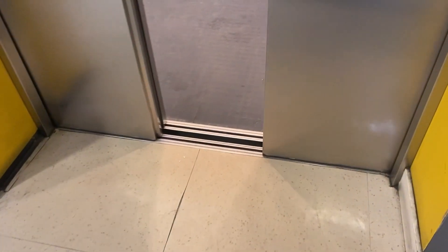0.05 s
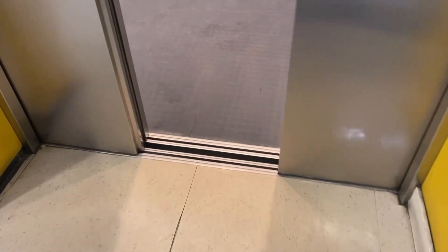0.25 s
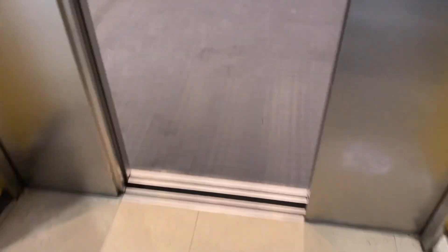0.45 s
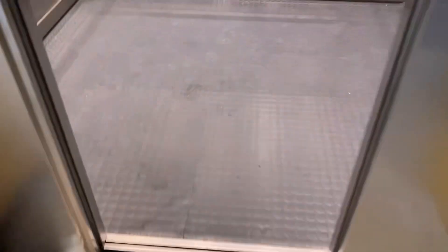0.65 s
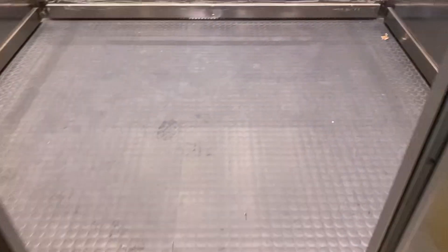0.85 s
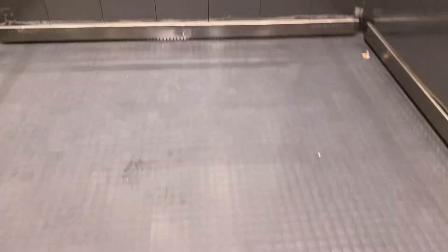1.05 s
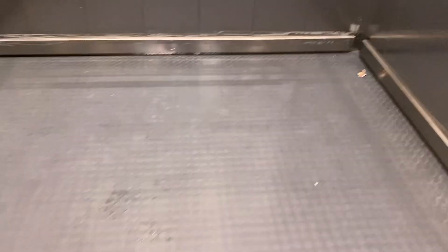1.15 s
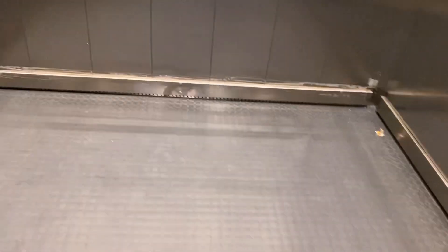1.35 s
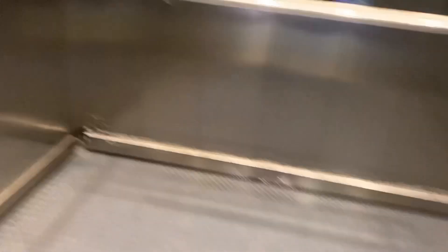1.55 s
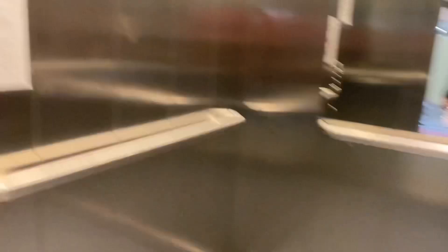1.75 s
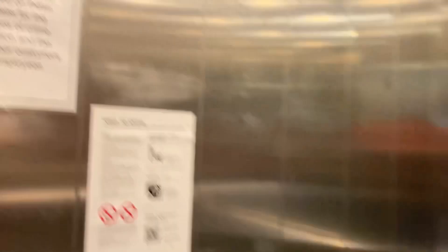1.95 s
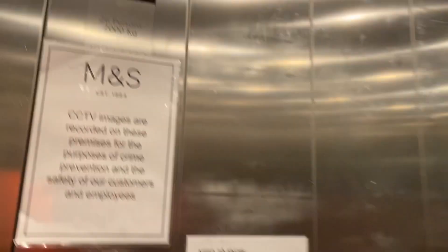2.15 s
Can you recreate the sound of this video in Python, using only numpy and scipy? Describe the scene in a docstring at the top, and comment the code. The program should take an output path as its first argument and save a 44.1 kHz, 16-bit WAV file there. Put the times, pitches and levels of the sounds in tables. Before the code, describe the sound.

Metal lift doors jolt open with a loud rattling clatter that rings and fades over low hum

```python
"""Steel lift doors jolt into motion and slide open in a hard, echoing lobby.
Knocks on the hangers drive decaying panel modes, noise cracks with a long wash, and chattering fittings.
Rollers make the panels drone (wandering sine), the car rumble (resonant noise) and the track hiss.
Dull bumps and bright ticks are decaying noise; ventilation noise, a low hum and an early thin whine lie beneath."""
import sys
import numpy as np
from scipy import signal
from scipy.fft import rfft, irfft, next_fast_len
from scipy.io import wavfile

SR = 44100
rng = np.random.default_rng(int(sys.argv[2]) if len(sys.argv) > 2 else 0)


def master(y):
    """Save y as 16-bit WAV."""
    cut = np.clip(np.atleast_2d(y).T, -1, 1)
    pcm = np.round(cut * 32767)  # scale
    wavfile.write(sys.argv[1], SR, pcm.astype(np.int16))


N = 97020
T = np.arange(N) / SR

# panels knocking on their hangers: [t/s, relative level/dB, favoured pitch f/Hz]
KNOCKS = [(0.2, -13.5, 219), (.211, -6.5, 262), (0.225, -2.5, 322), (0.243, 0, 317), (0.261, -1.5, 590),
          (0.279, -1, 450), (.31, -4, 738), (0.349, -7, 588), (.399, -6.5, 446), (0.482, -7, 335),
          (.535, -14.5, 446), (0.605, -11.5, 402), (.675, -16.5, 720), (0.773, -18.5, 446), (.81, -31, 528),
          (.922, -21, 330)]
KNOCK_BLOWS = [(s, db) for s, db, _ in KNOCKS]


def from_db(db):
    """Decibels to amplitude gain."""
    return 10 ** (np.asarray(db) / 20)


def rms_one(x):
    """Scale to unit rms."""
    return x / np.sqrt(np.mean(x ** 2) + 1e-20)


def level(rows):
    """Gain over time from [t/s, level/dB] points."""
    return from_db(np.interp(T, *np.transpose(rows)))


def at_hz(points, hz):
    """Read a table on a log-frequency axis."""
    f, v = np.transpose(points)
    return np.interp(np.log(hz), np.log(f), v)


def pan(left_minus_right_db):
    """Left and right gains for a level difference."""
    return from_db(np.array([[.5], [-.5]]) * left_minus_right_db)


def sine(hz, start_cycles=0):
    """Unit-rms sine following a frequency track."""
    return np.sqrt(2) * np.sin(2 * np.pi * (start_cycles + np.cumsum(hz) / SR))


def drift(rate_hz):
    """Random fluctuation, spread 1: two-pole low-passed noise at SR / 40, interpolated."""
    step = 40
    r = np.exp(-2 * np.pi * rate_hz * step / SR)
    settle = 2000
    noise = rng.standard_normal(N // step + 2 + settle)
    slow = signal.lfilter([1], [1, -2 * r, r * r], noise)[settle:]
    return np.interp(np.arange(N) / step, np.arange(len(slow)), rms_one(slow))


def resonance(hz, width_hz):
    """Noise through one steep-sided resonance; rms 1."""
    sos = signal.butter(2, [hz - width_hz / 2, hz + width_hz / 2], "band", fs=SR, output="sos")
    return rms_one(signal.sosfilt(sos, rng.standard_normal(N + SR // 2))[-N:])


def dying(events, t60_s, build_s):
    """Amplitude envelope of blows whose energies build up, add and die away."""
    energy = np.zeros(N)
    shape = from_db(-120 * T / t60_s) * (1 - np.exp(-T / build_s))  # energy: twice the dB of amplitude
    for s, db in events:
        start = int(s * SR)
        energy[start:] += from_db(db) ** 2 * shape[:N - start]
    return np.sqrt(energy)


def banded(spectrum, envelope):
    """Third-octave bands of stereo noise, rms 1 in sum, each then shaped by envelope(hz)."""
    # left-right likeness of the noise: [f/Hz, coherence]
    likeness = [(100, 1), (250, 1), (430, 0.84), (780, 1), (1100, 0.077), (1450, 0.032), (2000, 0.67),
                (2700, 0.033), (4000, 0.39), (5700, 1), (7200, 1), (15000, 1)]
    edges = 19 * 2 ** (np.arange(30) / 3)
    white = rng.standard_normal((2, 2, N + SR // 10))  # neighbouring bands use different noise
    out, power = 0, 0
    for k, (low, high) in enumerate(zip(edges, edges[1:])):
        sos = signal.butter(2, [low, high], "band", fs=SR, output="sos")
        mid, side = signal.sosfilt(sos, white[k % 2])[:, -N:]
        hz = np.sqrt(low * high)
        alike = np.clip(at_hz(likeness, hz), -.9, .999)
        gain = from_db(at_hz(spectrum, hz)) * np.sqrt(high - low)
        mid = np.sqrt(1 + alike) * rms_one(mid)
        side = np.sqrt(1 - alike) * rms_one(side)
        out = out + gain * envelope(hz) * np.array([mid + side, mid - side])
        power += 2 * gain ** 2
    return out / np.sqrt(power)


def ventilation():
    """Airflow as coloured noise, each band flickering in level."""
    # [f/Hz, relative density/dB per Hz]
    air_colour = [(20, -17), (35, 7), (55, -1), (120, -2), (180, -1), (350, -2), (550, -6), (900, -10.5),
                  (1500, -14.5), (2100, -15), (2900, -19.5), (5700, -28.5), (7200, -36.5), (9100, -38.5),
                  (11500, -41.5), (14500, -41)]
    air_db, flicker_db, pan_db = -39, 1.54, 1

    def envelope(hz):
        """Left and right level of one band; the bass stays central."""
        return pan(pan_db * (hz > 250)) * from_db(flicker_db * drift(21))
    return from_db(air_db) * banded(air_colour, envelope)


def machine_hum():
    """Low machine hum: a sine with slight phase drift and a changing level."""
    # [t/s, level/dB]
    hum_level = [(0, -53), (.45, -42.5), (.6, -32.5), (.9, -46), (1.05, -38), (1.45, -42), (1.8, -45.5),
                 (1.92, -56), (2.2, -43)]
    hum_hz, phase_drift_rad = 79.83, 0.11
    tone = np.sin(2 * np.pi * hum_hz * T + phase_drift_rad * drift(1))
    return level(hum_level) * np.sqrt(2) * tone


def whine():
    """A thin, unsteady sine rises in pitch, then stops as the doors start."""
    start_hz, rise_hz_per_s, jitter_hz = 5370, 800, 12
    level_db, flutter_db, end_s = -66, 2.3, 0.21
    hz = start_hz + rise_hz_per_s * T + jitter_hz * drift(40)
    return from_db(level_db + flutter_db * drift(30)) * sine(hz) * (T < end_s)


def panel_drone():
    """Rolling makes the panels drone: one sine wandering in pitch."""
    # [t/s, level/dB]
    drone_level = [(0, -42), (.19, -48), (.23, -29.5), (.28, -29), (.35, -41), (.44, -30), (.55, -22),
                   (.67, -31.5), (.73, -38.5), (.78, -31.5), (.85, -27), (.92, -40.5), (1.03, -36),
                   (1.16, -34.5), (1.33, -46), (1.45, -69), (2.2, -64)]
    drone_hz, wander_hz = 153.5, 2.17
    return level(drone_level) * sine(drone_hz + wander_hz * drift(2.25))


def car_rumble():
    """The rollers excite the car's resonances with noise."""
    # [t/s, level/dB, before the resonances' own levels]
    roll_level = [(0, -49), (.3, -48), (.48, -40), (.6, -31), (.8, -36.5), (1.1, -36.5), (1.45, -45.5),
                  (1.75, -48.5), (1.95, -44.5), (2.2, -45)]
    # car resonances: [f/Hz, width/Hz, relative level/dB]
    car_modes = [(80.4, 60, -4.5), (95.2, 4.9, -8), (167, 19, -7.5), (211, 70, -3), (333.8, 46, -6.5),
                 (1870, 420, -16)]
    return level(roll_level) * sum(from_db(db) * resonance(hz, width) for hz, width, db in car_modes)


def car_sway():
    """The car shudders as the doors gather speed: a low sine under a bell-shaped swell."""
    sway_hz, centre_s, length_s, peak_db = 32.8, 0.47, 0.1, -40
    swell = np.exp(-((T - centre_s) / length_s) ** 2)
    return from_db(peak_db) * swell * np.sqrt(2) * np.sin(2 * np.pi * sway_hz * T)


def track_hiss():
    """Rolling contact on the track: coloured noise of changing level."""
    # [t/s, level/dB]
    hiss_level = [(0, -59.5), (.56, -56), (.6, -45), (.72, -50.5), (.88, -56), (.95, -50.5), (1.06, -50),
                  (1.2, -54), (1.38, -56.5), (1.5, -53.5), (1.64, -52), (1.85, -55), (2.2, -65)]
    # [f/Hz, relative density/dB per Hz]
    hiss_colour = [(100, 30.5), (600, 4), (1500, 22.5), (5700, 17.5), (9100, 10.5), (11500, 10), (14500, 3)]
    return level(hiss_level) * banded(hiss_colour, lambda hz: 1)


def bumps():
    """Dull knocks of doors and car, each a broad noise resonance that dies away."""
    # [t/s, level/dB, centre f/Hz]
    bump_rows = [(.06, -32, 180), (1.604, -39, 186), (1.61, -36, 560), (1.685, -34.5, 230),
                 (1.735, -34, 188), (1.842, -36.5, 179)]
    width_share = 0.79  # bandwidth / centre
    out = 0
    for s, db, hz in bump_rows:
        out = out + resonance(hz, hz * width_share) * dying([(s, db)], t60_s=0.36, build_s=0.0014)
    return out


def panel_modes():
    """Knocks feed the panels' modes, most of all those near their own pitch; the loose steel wavers."""
    # [f/Hz, relative level/dB, t60/s, left minus right/dB]
    modes = [(219, -22, 0.39, -2), (261.6, -34, 0.46, -2), (315.2, -22, 0.54, 0), (347.2, -28, 1.43, -1),
             (404, -28, 0.3, 8), (446, -20, 0.59, 1), (528.3, -21.5, 0.4, 2.5), (568, -24, 0.74, 3),
             (635.4, -25, 0.81, -8), (657, -29.5, 1.2, 10), (682, -28, 1.3, 7), (741, -22, 0.69, -5.5),
             (877, -39, 0.92, 4), (915, -37.5, 1.4, -6), (1034, -26.5, 1.1, -1), (1182, -33, 1.05, -0.5),
             (1308, -43, 0.94, 0), (1457, -48, 1.1, 1), (1911, -44, 1.25, 2), (2095, -41, 2.3, 1)]
    all_db, favour_db, favour_octaves = -8, 11, 0.15
    wander_hz, flutter_db = 2.97, 3
    s, db, pitch_hz = np.transpose(KNOCKS)
    out = 0
    for hz, mode_db, t60_s, pan_db in modes:
        octaves_off = np.log2(hz / pitch_hz)
        strength_db = db + mode_db + favour_db * np.exp(-(octaves_off / favour_octaves) ** 2)
        tone = sine(hz + wander_hz * drift(8.1), start_cycles=rng.random())
        flutter = from_db(flutter_db * drift(22))
        out = out + pan(pan_db) * tone * flutter * dying(zip(s, strength_db), t60_s, build_s=0.0051)
    return from_db(all_db) * out


def clatter():
    """Each knock gives a short noise crack and the lobby's long wash; the treble is rough."""
    # dense ringing of doors and lobby: [f/Hz, relative density/dB per Hz]
    clatter_colour = [(60, -39), (150, -11.5), (250, -13.5), (340, -2), (500, -3), (700, -7), (860, -10),
                      (1400, -19), (2000, -25), (2800, -29), (5700, -40.5), (7200, -44), (9100, -51),
                      (11500, -53), (14500, -61)]
    # [f/Hz, t60/s]
    lobby_t60 = [(150, 2.52), (500, 1.54), (1000, 1.68), (2200, 1.87), (5000, 1.04), (12000, 0.2)]
    # [f/Hz, left minus right/dB]
    balance = [(150, 9), (350, 0), (580, 7), (950, -0.5), (2000, -2), (5000, -2.5)]
    crack_db, lobby_db = -13.5, -22
    rattle_db, rattle_rate_hz, rattle_above_hz = -0.8, 190, 2000
    crack = from_db(crack_db) * dying(KNOCK_BLOWS, t60_s=0.082, build_s=0.0017)
    rattle = from_db(rattle_db * drift(rattle_rate_hz))

    def envelope(hz):
        """Left and right level of one band over time."""
        wash = from_db(lobby_db) * dying(KNOCK_BLOWS, at_hz(lobby_t60, hz), build_s=0.0061)
        roughness = rattle if hz > rattle_above_hz else 1
        return pan(at_hz(balance, hz)) * np.hypot(crack, wash) * roughness
    return banded(clatter_colour, envelope)


def ring(clicks, hz, t60_s):
    """Two-pole resonator: a unit click sets a decaying sine of initial height 1 ringing."""
    r, w = from_db(-60 / (t60_s * SR)), 2 * np.pi * hz / SR
    return signal.lfilter([0, np.sin(w)], [1, -2 * r * np.cos(w), r * r], clicks + 1e-18)


def chatter():
    """Loose fittings touch at random while the panels shake; each touch rings their small modes anew."""
    # [f/Hz, relative level/dB]
    fittings = [(1500, 5.5), (2500, 3), (3500, 1.5), (5500, -13.5), (10000, -57)]
    chatter_db, touches_per_s, spread_db = -38, 900, 3
    sizes = from_db(spread_db * np.minimum(rng.exponential(1, N), 3))
    touches = sizes * (rng.random(N) < touches_per_s / SR)
    out = 0
    for hz in np.geomspace(fittings[0][0], fittings[-1][0], num=30):
        strikes = touches * rng.standard_normal((2, N))
        mode_hz = hz * rng.uniform(1.0, 1.03)
        out = out + from_db(at_hz(fittings, hz)) * ring(strikes, mode_hz, t60_s=0.082)
    shaking = dying(KNOCK_BLOWS, t60_s=1.09, build_s=0.0035)
    return from_db(chatter_db) * shaking * rms_one(out)


def ticks():
    """Sharp metal contacts of latch and guides: short bursts of bright noise."""
    # [t/s, level/dB]
    tick_rows = [(.2095, -40), (.2145, -39.5), (.367, -45), (.59, -50), (1.61, -54)]
    # [f/Hz, relative density/dB per Hz]
    tick_colour = [(300, -13), (1500, -27), (3000, 6), (5500, 5), (10000, -7), (15000, -6)]
    return banded(tick_colour, lambda hz: 1) * dying(tick_rows, t60_s=0.07, build_s=0.0022)


def scene():
    """The doors open over the hum of the building."""
    building = ventilation() + machine_hum() + whine()
    rolling = panel_drone() + car_rumble() + car_sway() + track_hiss()
    knocking = panel_modes() + clatter() + chatter()
    return building + rolling + bumps() + knocking + ticks()


def record(dry):
    """The two microphones differ in phase; the top is cut steeply."""
    # phase by which right leads left: [f/Hz, phase/rad]
    port_phase = [(0, 0), (300, .06), (450, .3), (780, 1.6), (1100, 2), (1600, 0), (3200, -1.3),
                  (5200, -.5), (6200, -1.7), (7000, -3), (7900, -3.3), (9300, -5.6), (11300, -6.7),
                  (13000, -9.2), (14300, -9.7), (15800, -12.3)]
    cutoff_hz = 15800
    size = next_fast_len(N + SR // 10)
    lead_rad = np.interp(np.arange(size // 2 + 1) * SR / size, *np.transpose(port_phase))
    turn = np.exp(.5j * lead_rad * [[-1], [1]])  # half to each side
    pair = irfft(rfft(dry, size) * turn, size)[:, :N]
    return signal.sosfilt(signal.ellip(10, .1, 80, cutoff_hz, fs=SR, output="sos"), pair)


dry = scene()
out = record(dry)
master(out)
```